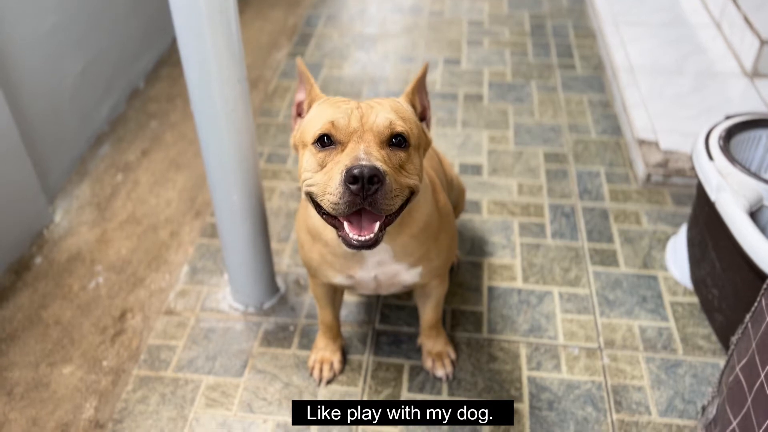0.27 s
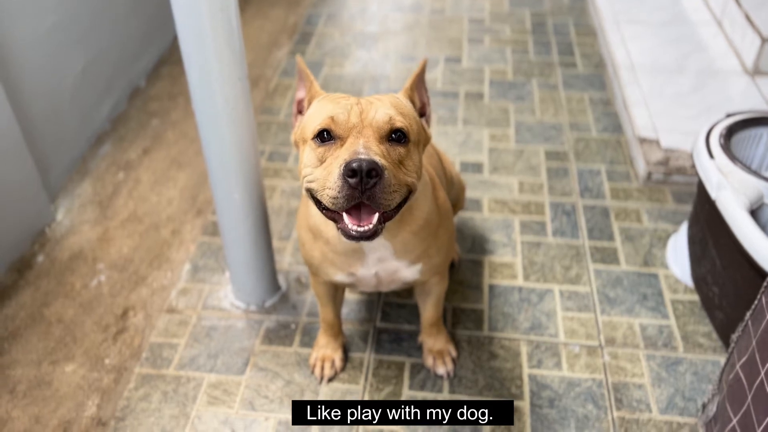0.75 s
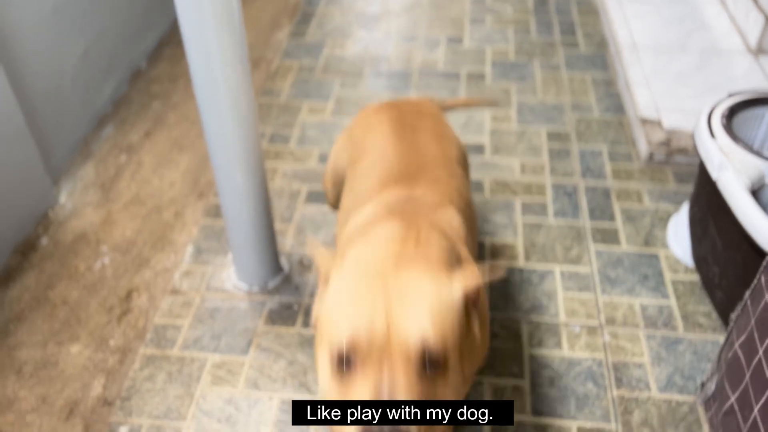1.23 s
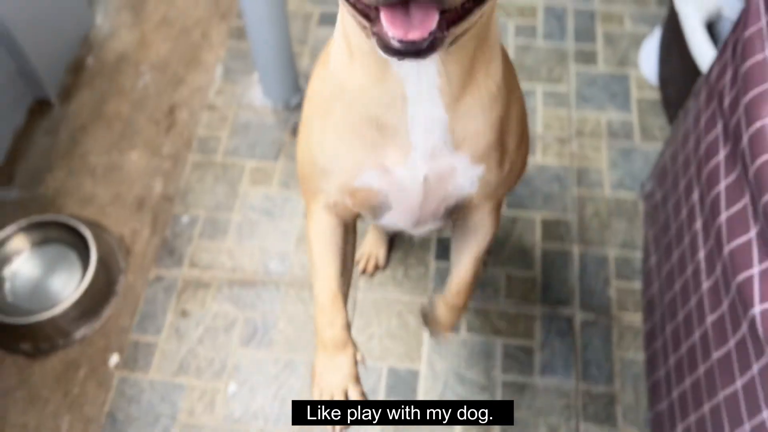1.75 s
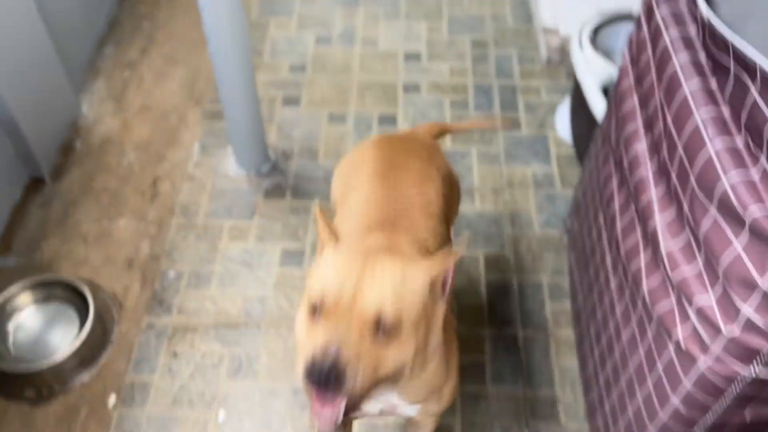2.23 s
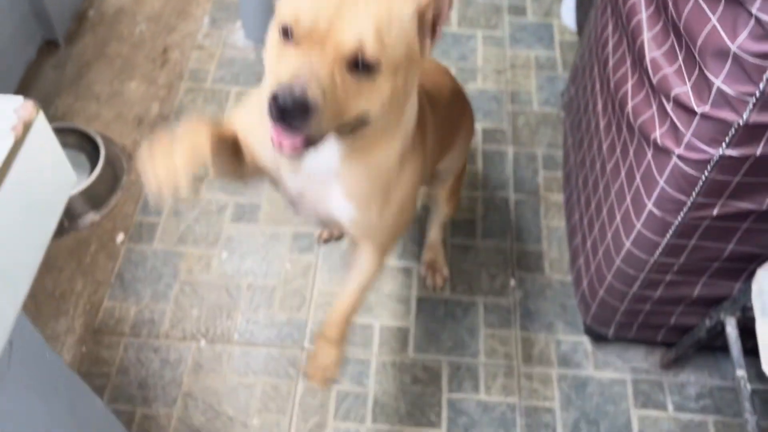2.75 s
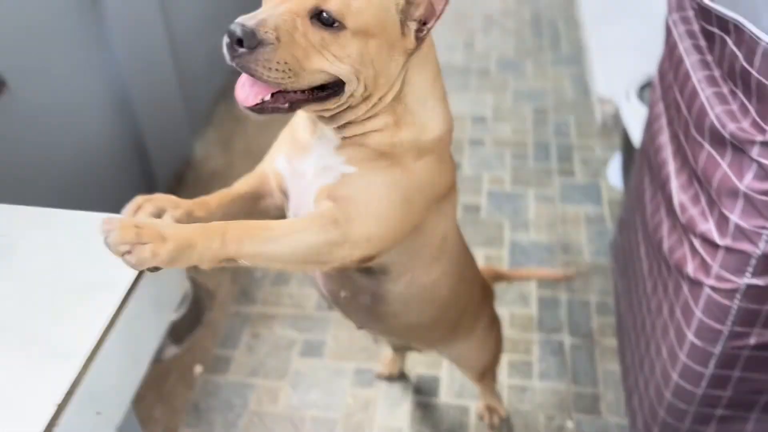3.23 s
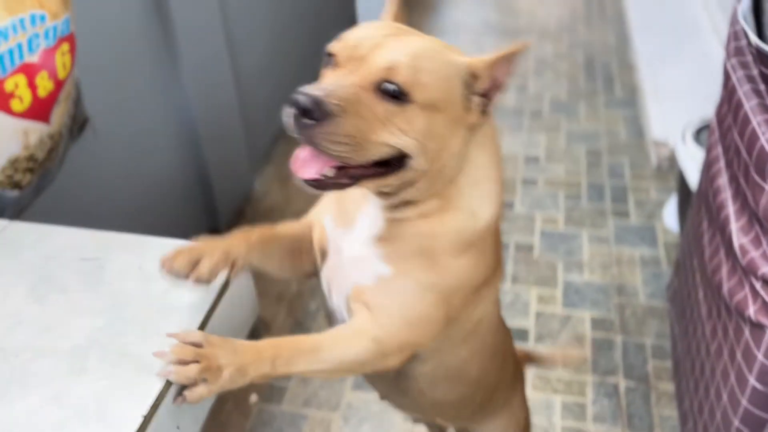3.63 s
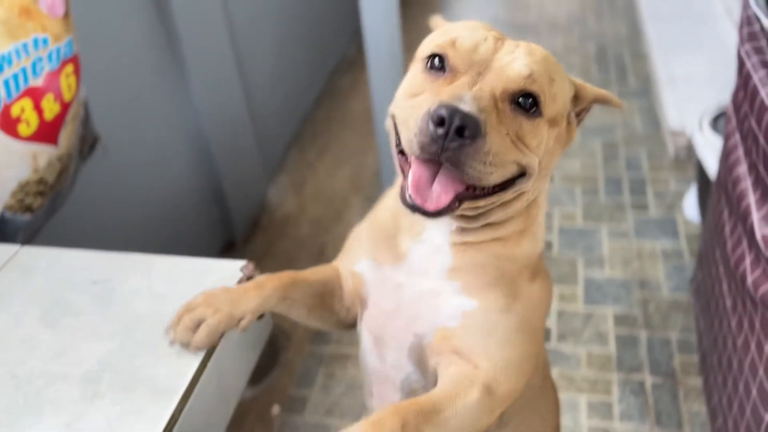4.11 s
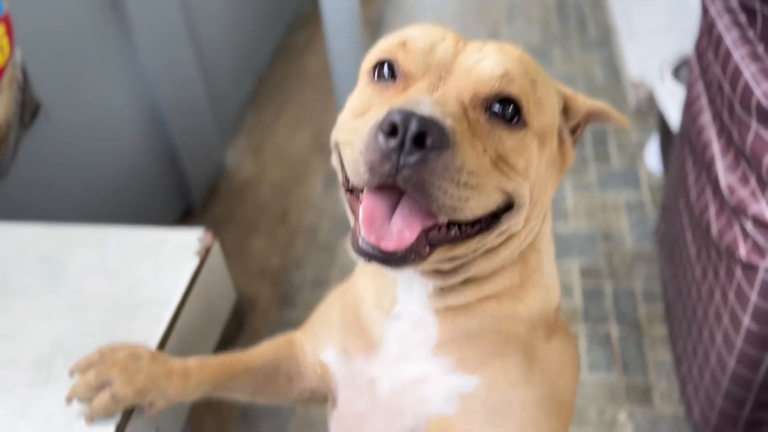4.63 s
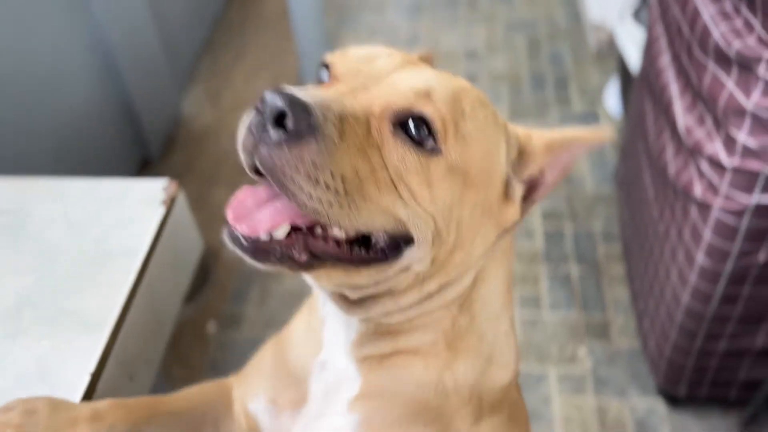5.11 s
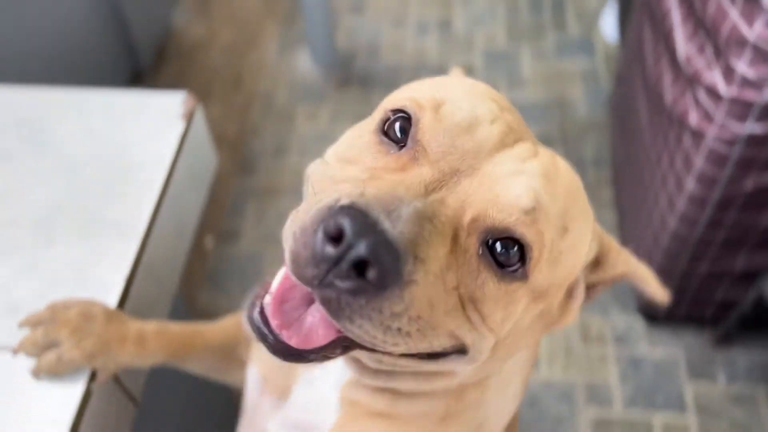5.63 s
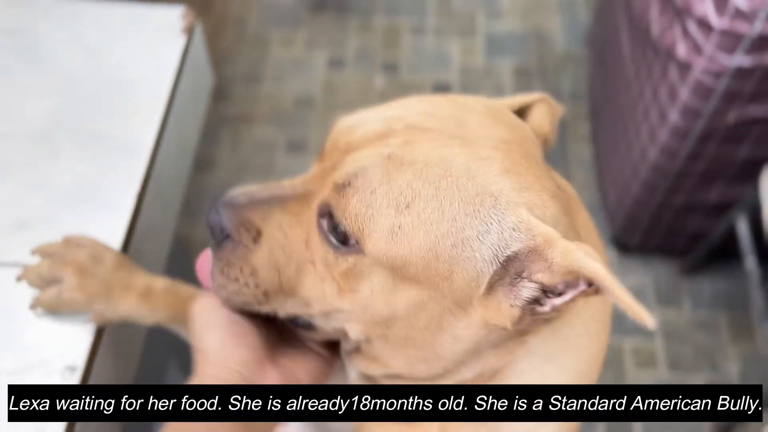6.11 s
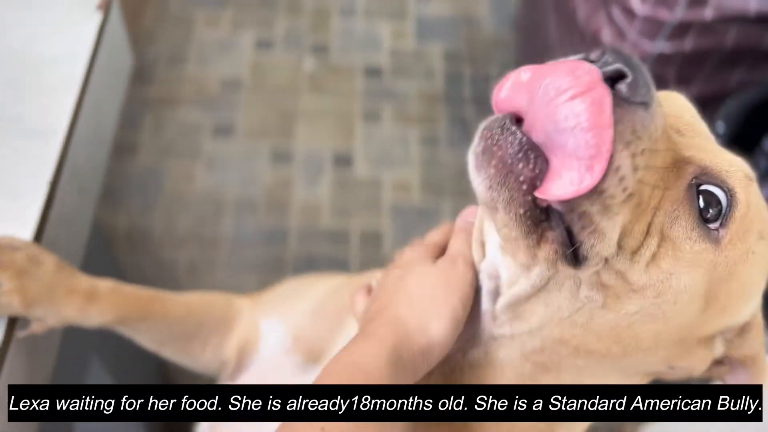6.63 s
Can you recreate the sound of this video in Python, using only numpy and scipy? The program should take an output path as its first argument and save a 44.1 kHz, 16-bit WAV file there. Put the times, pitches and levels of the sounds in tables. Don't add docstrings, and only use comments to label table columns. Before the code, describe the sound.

A small walled, tiled yard with low traffic-like rumble, airy wash and hiss, heard through a phone microphone with hard limiting. A hen clucks at 0.0 and 0.2 s, then from 0.4 to 0.75 s a low run-up flips into a loud, high, hoarse squawk with a short bright ring. A paw steps firmly near 1.05 s. The sound sinks to silence around 1.7 s and swells back, with a chick's climbing, splitting squeak at 2.0 s. A rooster's crow falls away from 2.3 to 2.9 s under short clucks at 2.5, 2.7, 2.9, 3.2 and 3.5 s. Claws tick dryly and a dog pants softly. A small bird chirps at 4.0 s, one cluck follows at 4.3 s, a second squawk at 4.5-4.9 s, and another chirp at 5.0 s. A paw thuds with claw pings at 5.5 s; from 5.8 s the background becomes much quieter, with sharp ticks near 5.97 s and faint breaths to the end.

```python
import sys
import numpy as np
from scipy import signal
from scipy.io import wavfile
from scipy.ndimage import uniform_filter1d, minimum_filter1d

SR = 44100
rng = np.random.default_rng(int(sys.argv[2]) if len(sys.argv) > 2 else 0)


def ratio(d):
    e = np.asarray(d, float) / 20
    return 10 ** e


def generate_wav(signal):
    frames = np.transpose(np.atleast_2d(signal))
    scaled = np.clip(frames, -1, 1) * 32767
    pcm = np.round(scaled).astype(np.int16)
    wavfile.write(sys.argv[1], SR, pcm)


N = 302526


def evened(x, size=None):
    power = np.mean(x ** 2) if size is None else uniform_filter1d(x ** 2, size)
    return x / np.sqrt(abs(power) + 1e-20)


def read(points, hz):
    f, value = np.transpose(points)
    return np.interp(np.log(hz + 1), np.log(f + 1), value)


def unroll(rows):
    s, *columns = np.transpose(rows)
    t = np.arange(s[0], s[-1], 1 / SR)
    return t, [np.interp(t, s, c) for c in columns]


def add(mix, s, sound):
    at = round(s * SR)
    sound = sound[max(-at, 0):]
    part = mix[max(at, 0):][:len(sound)]
    part += sound[:len(part)]


def resonate(x, hz, width):
    turn = np.exp(2j * np.pi * np.cumsum(hz * np.ones(len(x))) / SR)
    r = np.exp(-np.pi * width / SR)
    once = signal.lfilter([1 - r], [1, -r], x / turn + 1e-18)
    return 2 * (turn * signal.lfilter([1 - r], [1, -r], once)).real


def drift(n, size):
    return evened(uniform_filter1d(uniform_filter1d(rng.standard_normal(n), size), size))


def high_pass(x, order, hz):
    return signal.sosfilt(signal.butter(order, hz, "high", fs=SR, output="sos"), x)


def low_pass(x, order, hz):
    return signal.sosfilt(signal.butter(order, hz, fs=SR, output="sos"), x)


# from_s, rumble_db, wash_db, hiss_db
YARD = [
    (0, -45.5, -53.5, -64.5),
    (2.276, -50, -58.5, -63.5),
    (5.794, -70.5, -63.5, -68),
]


def yard_spot():
    return np.searchsorted(np.transpose(YARD)[0], np.arange(N) / SR, "right") - 1


# freq_hz, density_db
RUMBLE = [(59, -52.5), (100, -19.5), (194, -2), (259, -11), (580, -12.5), (1600, -23.5), (2080, -63),
          (3520, -120)]
# freq_hz, density_db
WASH = [(410, -38.5), (700, -18.5), (1500, -2.5), (2980, -7.5), (5600, -16), (7080, -30.5), (8000, -41),
        (10400, -80.5)]
# freq_hz, density_db
HISS = [(5000, -44), (8500, -9), (12100, -2.5), (15300, 4), (16000, -4.5), (16300, -10.5), (16500, -77)]
# time_s, level_db
BUSTLE = [(0, 4), (.8, -4), (1.1, 0), (1.25, -4), (1.55, -2.5), (1.9, -2), (2.272, -5), (2.282, 7),
          (2.6, 4.5), (3.3, -0.5), (4, -1.5), (4.6, 4), (5.3, -9.5), (5.79, -5), (5.805, -23),
          (5.881, -0.5), (6.05, -2), (6.28, -6.5), (6.55, -7), (6.86, -3)]


def yard():
    _, *levels_db = np.transpose(YARD)
    spot = yard_spot()
    bustle_db = np.interp(np.arange(N) / SR, *np.transpose(BUSTLE))
    bustle_shares = (1, 2.3, 0.76)
    gusts_db = (1.5, 1.2, 3)
    frames, hz = N // 256 + 5, np.fft.rfftfreq(1024, 1 / SR)
    out = ratio(-77.5) * evened(resonate(rng.standard_normal(N), hz=140, width=30))
    for shape, level_db, share, gust_db in zip((RUMBLE, WASH, HISS), levels_db, bustle_shares, gusts_db):
        a, b, patches = rng.standard_normal((frames, 513, 3)).T
        patches = evened(uniform_filter1d(uniform_filter1d(patches, 10, 0), 10, 1))
        colour_db = read(shape, hz)[:, None] + 2 * patches + gust_db * drift(frames, size=8)
        layer = signal.istft((a + 1j * b) * ratio(colour_db), nperseg=1024, noverlap=768)[1][:N]
        out = out + evened(layer) * ratio(level_db[spot] + share * bustle_db)
    return out


HOARSE = {"cluck": [(0, .36), (.2, .26), (.45, .14), (.7, .13), (1, .26)], "run-up": [(0, .3), (.18, .07),
          (.42, .08), (.58, .18), (1, .24)], "squawk": [(0, .18), (.08, .09), (.22, .03), (.63, .012),
          (.76, .08), (.84, .5), (1, .6)]}
# freq_hz, width_hz, level_db
THROAT = [
    [(427, 600, -9.5), (747, 180, -10.5), (1044.5, 286, 7.5), (1396, 504, 8.5), (1747, 833, 4)],
    [(2612, 1500, 3.5), (3900, 140, -14), (2566, 830, 4)],
    [(4410, 810, -0.082), (5030, 530, -0.62), (5775, 450, -1)],
]


def hen(rows, kind, neck, turn=1):
    t, (effort_db, hz, gape, shrill_db) = unroll(rows)
    s, *posture = np.transpose(neck)
    stretch, chest_db, split = (np.interp(t, s, c) for c in posture)
    octaves = np.log2(hz / 497)

    middle_shut_db, middle_wide_db = -18.5, 8
    upper_shut_db, upper_wide_db, upper_db_per_octave = -19, -11, 17.5
    middle_db = middle_shut_db + (middle_wide_db - middle_shut_db) * gape
    upper_db = upper_shut_db + (upper_wide_db - upper_shut_db) * gape
    upper_db = upper_db + upper_db_per_octave * octaves + shrill_db
    reach_low, reach_per_octave = (1.0045, .93, 1.024), (-0.22, 0.33, -0.14)
    postures = (stretch, turn, 1)
    reach = [(low + slope * octaves) * more for low, slope, more in zip(reach_low, reach_per_octave, postures)]

    noisy = np.interp(np.linspace(0, 1, len(t)), *np.transpose(HOARSE[kind]))
    noisy = np.clip(noisy * (2.5 + 0.035 * (effort_db.max() - effort_db)), 0, .8)
    jitter = .06 * noisy * drift(len(t), size=60) + .05 * noisy * drift(len(t), size=400)
    turns = np.cumsum(hz * (1 + jitter)) / SR
    pulses = np.zeros(len(t))
    for k in range(1, 23):
        flutter = ratio(2.2 * drift(len(t), size=500))
        pulses += flutter * np.cos(2 * np.pi * k * turns + 0.13 * k * k)
    pulses *= 1 + np.clip(split + .5 * noisy, 0, 2) * np.cos(np.pi * turns)
    puffs = (.3 + np.exp(-(turns % 1) / 0.66)) * rng.standard_normal(len(t))
    pulses, puffs = evened(pulses), evened(puffs)

    drives, bands = [], []
    for more, band, beak in zip((.6, 1.1, 1.6), THROAT, reach):
        share = np.minimum(noisy * more, .9)
        drive = (1 - share) * pulses + share * puffs
        ringing = sum((-1) ** k * ratio(db) * resonate(drive, f * beak, w) for k, (f, w, db) in enumerate(band))
        drives.append(drive)
        bands.append(evened(ringing, size=900))
    low, middle, upper = bands
    upper = low_pass(upper, 6, 6300)
    air = resonate(drives[-1], 8600, 5500) + ratio(-13) * resonate(drives[-1], 13500, 4500)
    air = ratio(-17.5) * evened(air)

    voice = low + ratio(chest_db) * np.cos(2 * np.pi * turns)
    voice = voice + ratio(middle_db) * middle + ratio(upper_db) * (upper + air)
    voice = voice - np.clip(0.1 - 2 * octaves, 0, 1) * resonate(voice, 3950.5, 599.5)
    voice = high_pass(voice, 2, 200)
    return t[0], ratio(effort_db) * voice * signal.windows.tukey(len(t), .015 * SR / len(t))


# peak_s, effort_db, pitch_hz, fall_s, low_band_factor
CLUCKS = [
    (-.004, -5, 512.7, 0.022, 0.99),
    (0.201, -5, 532.3, 0.037, 0.91),
    (2.458, -7.5, 487.2, 0.022, 0.99),
    (2.696, -7.5, 480.8, 0.025, 0.98),
    (2.933, -8.5, 490.2, 0.032, 0.97),
    (3.178, -9.5, 508.8, 0.038, 0.93),
    (3.533, -9, 487, 0.024, 0.99),
    (4.335, -9, 497.6, 0.043, 1.066),
]


def cluck(s, effort_db, hz, fall, stretch):
    rise_s, rise_db, fall_db = .017, -14, -11
    lead_s, lead_db = .007, -13.5
    start_hz, end_factor = hz * 1.07, 0.9
    gape_end = 0.064
    rows = [(s - rise_s - lead_s, effort_db + rise_db + lead_db, start_hz, 0, 0),
            (s - rise_s, effort_db + rise_db, start_hz, 0, 0),
            (s, effort_db, hz, 0, 0),
            (s + 0.61 * fall, effort_db - 3.5, hz * (1 + end_factor) / 2, 0, 0),
            (s + fall, effort_db + fall_db, hz * end_factor, gape_end, 0)]
    chest_db, split = -26, 0.22
    return hen(rows, "cluck", [(s, stretch, chest_db, split)])


# time_s, effort_db, pitch_hz, gape (0-1), shrillness_db
RUN_UPS = [
    [(.383, -29.5, 515.6, 0.5, 2), (.4, -9.5, 524.6, 0, -4.5), (.423, -0.5, 520.2, 0, -6.5),
     (.45, -15, 510, 0.46, -3), (.467, -9.5, 509, 0.3, -0.5), (.49, -15.5, 511.3, 0.45, -1),
     (.519, -9.5, 538, 0.66, 1)],
    [(4.525, -21, 488, 0.36, -5), (4.55, -10, 538.3, 0.17, -2), (4.58, -8, 522.7, 0.3, -0.5),
     (4.6, -20.5, 524, 0.4, 4), (4.616, -13, 602, 0.4, -4.5), (4.632, -12.5, 613, 0.37, -8),
     (4.655, -11.5, 626.4, 0.54, -5), (4.685, -17.5, 630, 0.74, 4)],
]
# time_s, effort_db, pitch_hz, gape (0-1), shrillness_db
SQUAWKS = [
    [(.515, -6, 714, 0.56, -1.5), (.556, -8, 718, 0.23, -5), (.582, -7.5, 688, 0.06, 1),
     (.598, -16, 667.6, 1, -5.5), (.648, -18.5, 665, 1, -6.5), (.678, -20, 678, 0.95, -1),
     (.7, -5, 704.4, 0, 0.5), (.718, -9.5, 716, 0.58, -3.5), (.77, -24.5, 634, 0.1, -2.5)],
    [(4.675, -13, 715, 0.5, -6.5), (4.706, -15.5, 720.2, 0, -3.5), (4.724, -14.5, 672.7, 0.3, 0.5),
     (4.78, -13, 678, .05, -3), (4.822, -10.5, 672, 0.03, -5), (4.838, -10, 721, 0.25, -8),
     (4.858, -12, 697.8, 0.62, -2), (4.885, -20.5, 682, 0, -1.5), (4.93, -28.5, 605, 0.5, 0)],
]
# time_s, low_band_factor, chest_tone_db, strong_weak_pulses (0-2)
NECKS = [
    [(.38, 0.97, -19, 0.066), (.46, 0.89, -24, 0.055), (.51, 0.99, -15.5, 0.24), (.55, 0.9, -6, 0.058),
     (.59, 1.1, -9, 0.021), (.66, 0.94, -7.5, .01), (.7, 1.01, -17.5, 0.039), (.735, 0.89, -21.5, 0.39)],
    [(4.52, 1.02, -16, 0.33), (4.56, 1.02, -14, .1), (4.61, 1.15, -10.5, 0.074), (4.635, .92, -10, 1.1),
     (4.665, 0.84, -19, 0.94), (4.69, 0.96, 1, 0.054), (4.75, 1.01, -13, 0.009), (4.85, 0.96, -8.5, 0.027),
     (4.89, 0.9, -22, 0.47)],
]


def squawks(mix):
    for run_up, cry, neck, turn in zip(RUN_UPS, SQUAWKS, NECKS, (0.91, 1.21)):
        add(mix, *hen(run_up, "run-up", neck))
        add(mix, *hen(cry, "squawk", neck, turn))


# time_s, peak_db, pitch_hz, t60_s
THUDS = [
    (0.891, -46, 950, 0.045),
    (1.036, -21, 525, 0.15),
    (1.058, -24.5, 229.4, 0.39),
    (5.507, -24, 1414, 0.027),
    (5.535, -25, 300, 0.068),
]
# time_s, peak_db, pitch_hz, t60_s
PINGS = [
    (5.507, -25.5, 3470, 0.024),
    (5.534, -32, 3750, 0.025),
    (5.689, -33.5, 3040, 0.027),
    (5.724, -35, 3160, 0.035),
    (5.79, -48.5, 6240, 0.032),
    (5.815, -41.5, 3760, 0.038),
    (5.972, -49, 4100, 0.046),
]


def thud(s, db, hz, t60):
    t = np.arange(9000) / SR
    puff = evened(resonate(rng.standard_normal(len(t)), hz, 440))
    return s, ratio(db - 8.5 - 60 * t / np.clip(t60, .03, .3)) * puff * np.minimum(t / 0.0011, 1)


# time_s, length_s, start_hz, end_hz, level_db
TWITTER = [(.9, 0.16, 3820, 3470, -44), (3.02, 0.041, 5900, 5000, -47), (3.04, 0.1, 4750, 4300, -41),
           (3.7, 0.13, 5700, 4400, -48), (5.3, .13, 3950, 3800, -59), (5.43, .06, 3700, 3570, -61),
           (5.6, .1, 2750, 3000, -54), (5.61, 0.11, 4580, 5700, -65.5), (5.8, .1, 3580, 3290, -64),
           (5.885, .08, 2500, 2700, -58), (5.93, 0.089, 3300, 3500, -52), (6.709, .046, 7000, 6770, -64)]
# time_s, length_s, start_hz,
# end_hz, level_db
FAR = [(1.7, 0.045, 3250, 3140, -58), (1.888, 0.036, 1270, 1370, -46.5), (1.974, .035, 4800, 5100, -33),
       (2.65, 0.023, 4457, 4600, -44), (5.075, 0.075, 4680, 4580, -39), (5.27, 0.1, 4900, 4800, -59),
       (5.3, .15, 2600, 2560, -60), (5.31, 0.11, 266, 178.3, -59), (5.5, 0.3, 202, 227, -54.5),
       (5.9, 0.1, 224, 216, -67.5), (6.62, 0.12, 5100, 5000, -66), (6.753, 0.13, 698, 670.4, -74)]


def far_bird(s, length, start_hz, end_hz, db, blur):
    n = round(length * SR)
    tone = resonate(rng.standard_normal(n), np.geomspace(start_hz, end_hz, n), blur * start_hz)
    return s, ratio(db) * evened(tone) * signal.windows.tukey(n, .6)


# time_s, length_s, level_db, upper_band_db, mouth_hz
PANTS = [(1.737, 0.46, -57, -4, 2260), (3.431, 0.25, -46.5, -3.5, 1340), (3.762, 0.099, -43.5, -1, 1740),
         (4.198, 0.074, -48.5, 6.5, 1590), (5.166, 0.092, -36.5, -7.5, 2020),
         (5.481, 0.098, -45.5, -9, 1290), (5.605, 0.12, -44, -36, 1520), (5.886, 0.16, -56.5, -17, 1230),
         (6.123, 0.11, -70, 6, 1730), (6.383, 0.1, -79, 9, 1397), (6.673, 0.11, -64, 3.5, 2094)]


def pant(s, length, db, upper_db, hz):
    u = np.linspace(0, 1, round(length * SR))
    air = rng.standard_normal(len(u)) * (1 + 0.33 * drift(len(u), size=80))
    low = evened(resonate(air, hz, 830) + 0.27 * resonate(air, 1200, 330) + 0.45 * resonate(air, 2200, 450))
    upper = evened(resonate(air, 3780, 810) - 0.54 * resonate(air, 5680, 890))
    return s, ratio(db) * (low + ratio(upper_db) * upper) * np.sin(np.pi * u ** .7) ** 1.5


def whistle(hz, depth, beat_hz, overtone_db, uneven):
    phase = 2 * np.pi * np.cumsum(hz * (1 + 0.0065 * depth * drift(len(hz), size=40))) / SR
    beat = np.cos(2 * np.pi * np.cumsum(beat_hz * (1 + uneven * drift(len(hz), size=300))) / SR)
    tone = np.sin(phase) + ratio(overtone_db) * (np.sin(2 * phase) + 0.068 * np.sin(3 * phase))
    return np.sqrt(2) * tone * (1 + depth * beat) * signal.windows.tukey(len(hz), .06)


# time_s, pitch_hz, level_db, second_membrane_depth (0-1)
SQUEAK = [
    (1.941, 1810, -35, 0),
    (1.957, 2004, -19, 0.11),
    (1.974, 2052, -19, 0),
    (1.987, 2385, -24.5, 0.25),
    (1.998, 2700, -21.5, 0.4),
    (2.002, 2887, -19, 0.7),
    (2.03, 3085, -14.5, .95),
    (2.055, 2804, -25, 1),
    (2.068, 2730, -34.5, 0.7),
]


def chick(rows):
    t, (hz, db, depth) = unroll(rows)
    overtone_db = np.maximum(-3 - 55 * depth, -26)
    voice = whistle(hz, depth, beat_hz=693, overtone_db=overtone_db, uneven=0.032)
    voice -= 0.75 * depth * resonate(voice, hz - 710, 500)
    rasp = ratio(-13.5) * (0.18 + depth) * evened(resonate(rng.standard_normal(len(t)), 1.4 * hz, 1400))
    return t[0], ratio(db) * low_pass(voice + rasp, 4, 6600)


# time_s, peak_db, top_band_db, low_band_db
TICKS = [(2.273, -51, -10, -1), (2.4078, -23.5, -5, -5), (2.5433, -24, -9, -6), (3.233, -36, -5, -4),
         (3.265, -28, -31, -21), (3.3029, -53, -6, -8), (3.3408, -32, -31, -28), (3.5132, -33.5, 1, -1),
         (3.59, -27.5, 2, -6), (3.701, -34, -13, -1), (3.755, -32, -8, -19), (3.921, -31, -23, 2.5),
         (3.947, -29, -28, -3), (4.219, -26, -12, 2), (5.51, -39.5, 0, 6.5), (5.5697, -40, -26, -4),
         (5.658, -40, 2, -13), (5.798, -28, -9, -11), (5.891, -38, -12, -0.5), (5.9632, -20.5, 5, -1.5),
         (5.9718, -19, -14, -24), (6.2124, -45, 12, -14), (6.3001, -28, -25.5, -33),
         (6.592, -43.5, -12, -7.5)]


def tick(s, db, top_db, low_db):
    t = np.arange(9000) / SR
    noise = rng.standard_normal(len(t))
    bright = evened(resonate(noise, 12010, 1800))
    top = evened(resonate(noise, 15110, 1200))
    dull = evened(resonate(noise, 5460, 3900))
    colour = bright - ratio(top_db) * top + ratio(min(low_db, 12)) * dull
    for hz in (10300, 13800):
        colour = colour - .85 * resonate(colour, hz, 700)
    crack, rattle = 1.6 * ratio(-60 * t / 0.0066), 0.12 * ratio(-60 * t / .24)
    return s, ratio(db - 9.5) * colour * (crack + rattle) * np.minimum(t / 0.00063, 1)


# time_s, pitch_hz, level_db
CROW = [
    [(2.294, 548.2, -20), (2.38, 536.7, -18.5), (2.46, 509.7, -19.5), (2.56, 500, -27.5),
     (2.665, 475, -34.5)],
    [(2.755, 447.3, -36.5), (2.83, 444.5, -44), (2.897, 419, -42.5)],
]
# freq_hz, gain_db
CROW_THROAT = [(500, 1), (1050, -4), (1480, -29), (1660, -11), (2100, -10), (2450, -18.5), (2720, -8.5),
               (3150, -18), (4200, -44.5)]


def rooster(rows):
    t, (hz, db) = unroll(rows)
    turns = np.cumsum(hz * (1 + .002 * drift(len(t), size=300))) / SR
    faded_db = CROW[0][1][2] - db
    partials = np.zeros(len(t))
    for k in range(1, 9):
        partial_db = read(CROW_THROAT, k * hz) + 0.06 * np.log2(k) * faded_db + drift(len(t), size=900)
        partials += ratio(partial_db) * np.cos(2 * np.pi * k * turns)
    return t[0], ratio(db) * partials * signal.windows.tukey(len(t), 0.0031 * SR / len(t))


# time_s, stretch_factor, pitch_factor, level_db, croak_db
CHIRPS = [
    (4.003, 1.0, .995, -13.5, -32.5),
    (4.959, 1, 1.003, -13, -37.5),
]
# from_start_s, pitch_hz, level_db
ARCHES = [
    (0, 2450, -22.5),
    (0.018, 3370, -10),
    (.031, 4600, -10.5),
    (.046, 3503, 1),
    (.056, 3466, 0),
    (.066, 2357, -14),
    (.077, 3400, -2.5),
    (.089, 3764, -2.5),
    (0.123, 2378, -11.5),
]


def chirp(s, stretch, pitch, db, croak_db):
    t, (hz, shape_db) = unroll(np.array(ARCHES) * [stretch, pitch, 1])
    hz = hz * (1 + .03 * drift(len(t), size=120))
    overtone_db = -24 - 0.033 * (hz - 2586.5) - 120 * t
    tone = whistle(uniform_filter1d(hz, size=120), depth=.8, beat_hz=123.2, overtone_db=overtone_db, uneven=.4)
    fuzz = evened(resonate(rng.standard_normal(len(t)), hz, 490))
    voice = ratio(db + shape_db) * tone + ratio(db + shape_db - 7.5) * fuzz
    add(voice, *far_bird(-0.0018, 0.027, 5200, 6500, db - 29.0, blur=.1))
    add(voice, *far_bird(.03, 0.071, 1700, 1520, croak_db, blur=470 / 1700))
    return s, voice


# freq_hz, t60_s
WALLS = [(250, 0.051), (1000, 0.46), (1400, 0.43), (3000, 0.34), (6000, 0.42), (12000, 0.11)]
# delay_s, level_db
ECHOES = [
    (.004, -8),
    (.009, -8),
    (0.015, -19),
    (0.024, -11.5),
    (0.031, -9.5),
]


def walls(x, tail_db, echo_db=0, smear=.55, smear_s=.009):
    taps = np.zeros(SR)
    at = np.arange(300, SR - 20, 20)
    taps[at + rng.integers(0, 20, len(at))] = rng.choice([-1., 1.], len(at))
    hz, t, z = signal.stft(taps, SR, nperseg=256)
    tail = signal.istft(z * ratio(-60 * t / read(WALLS, hz)[:, None]), SR, nperseg=256)[1]
    tail = ratio(tail_db) * tail / np.linalg.norm(tail)
    blurred = x * (np.sqrt(1 - smear ** 2) + smear * drift(len(x), size=round(smear_s * SR)))
    early = np.zeros(SR // 10)
    for k, (s, db) in enumerate([(0.00019, 0.0061)] + ECHOES):
        early[round(s * SR)] += (-1) ** k * ratio(db + echo_db * (k > 0))
    return signal.fftconvolve(x, early)[:N] + signal.fftconvolve(blurred, tail)[:N]


def scene():
    fowl, birds, dog = np.zeros((3, N))
    squawks(fowl)
    add(fowl, *chick(SQUEAK))
    for rows in CROW:
        add(dog, *rooster(rows))
    for rows, blur in ((FAR, .045), (TWITTER, .15)):
        for row in rows:
            add(dog, *far_bird(*row, blur))
    players = ((fowl, cluck, CLUCKS), (birds, chirp, CHIRPS), (dog, pant, PANTS),
               (dog, tick, TICKS), (dog, thud, THUDS), (dog, thud, PINGS))
    for mix, source, rows in players:
        for row in rows:
            add(mix, *source(*row))
    mix = ratio(-3.5) * walls(fowl, tail_db=-12.5)
    mix += ratio(-4.5) * walls(birds, tail_db=-14, echo_db=-3.0, smear=.85, smear_s=.0012)
    mix += walls(dog, tail_db=-10.5, echo_db=-16.5)
    return (mix + yard())[None]


def limit(x):
    room = minimum_filter1d(np.minimum(1.002 / (abs(x) + 1e-9), 1), size=300)
    return np.clip(x * uniform_filter1d(room, size=150), -1, 1)


def fade():
    dark_s, out_s, in_s, after_db = 1.688, 0.23, 0.27, 3
    t = np.arange(N) / SR - dark_s
    out = np.sin(np.pi / 2 * np.clip(-t / out_s, 0, 1))
    back = np.sin(np.pi / 2 * np.clip(t / in_s, 0, 1))
    return out ** 2.8 + ratio(after_db) * back ** 1.8


def roll_off(x):
    return signal.sosfilt(signal.butter(12, 16900, fs=SR, output="sos"), x)


def record(dry):
    low_cut_hz, edge_hz = 130, 15900
    notched = dry - .9 * resonate(dry[0], hz=8350, width=1200)
    coloured = high_pass(notched, 3, low_cut_hz)
    coloured = signal.oaconvolve(coloured, signal.firwin(255, edge_hz, fs=SR)[None], "same")
    shake_db = -79 + np.array((-3, 7, -4))[yard_spot()]
    shake = ratio(shake_db) * evened(resonate(rng.standard_normal(N), hz=62, width=45))
    return roll_off(limit(coloured + shake) * fade())


dry = scene()
out = record(dry)
generate_wav(out)
```